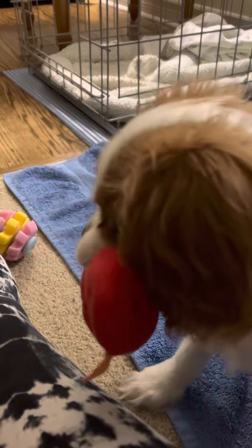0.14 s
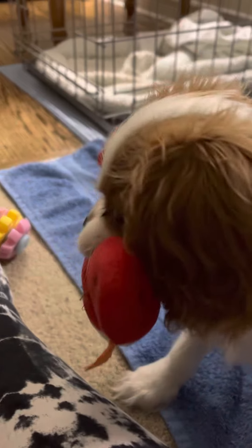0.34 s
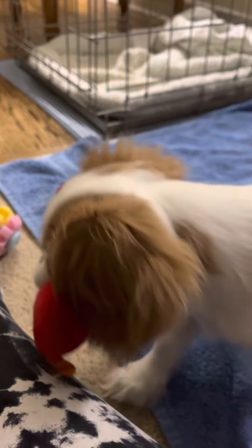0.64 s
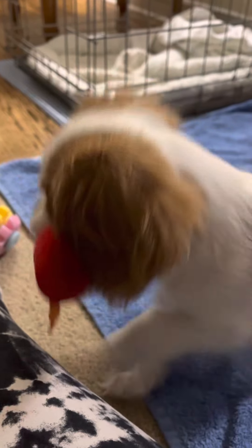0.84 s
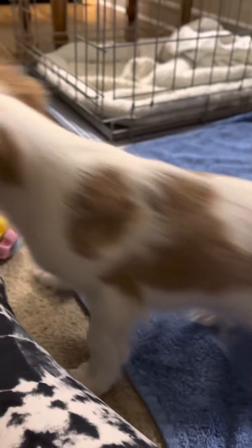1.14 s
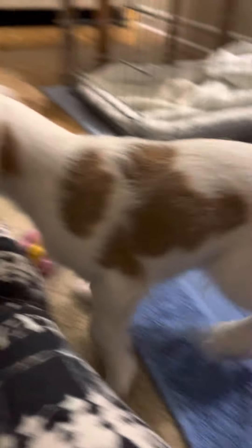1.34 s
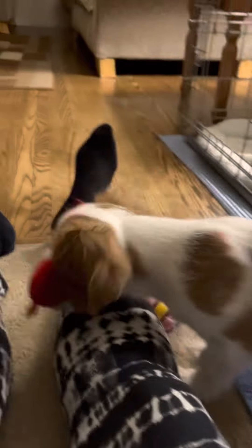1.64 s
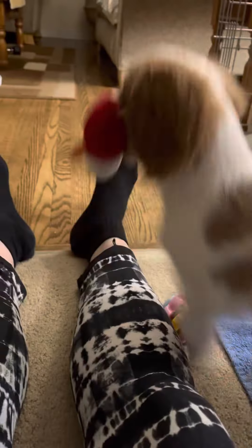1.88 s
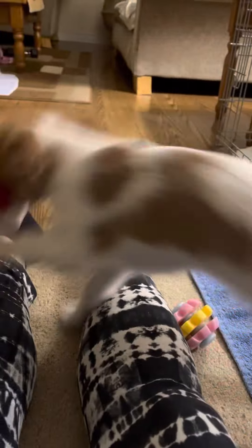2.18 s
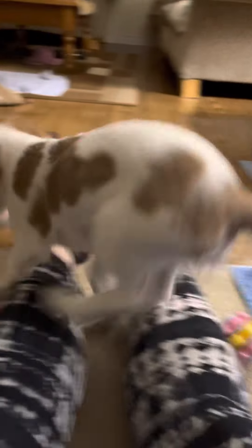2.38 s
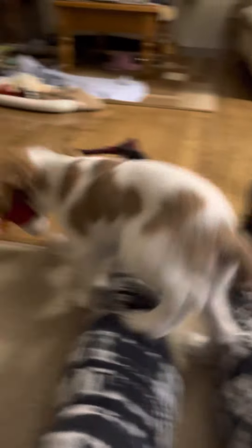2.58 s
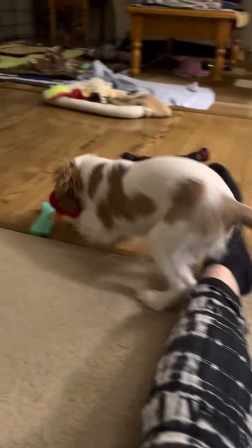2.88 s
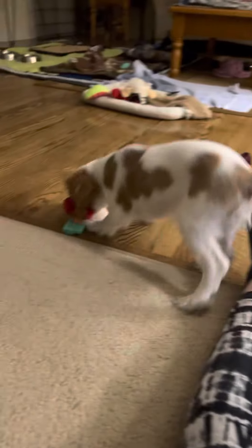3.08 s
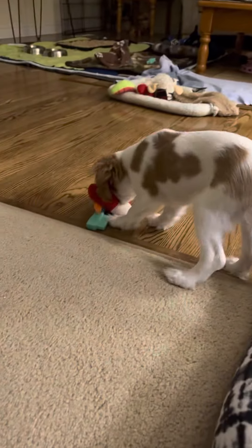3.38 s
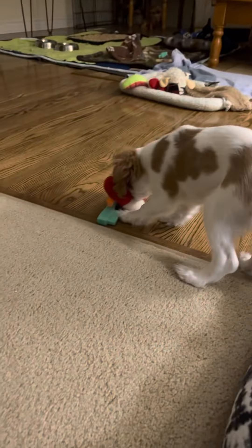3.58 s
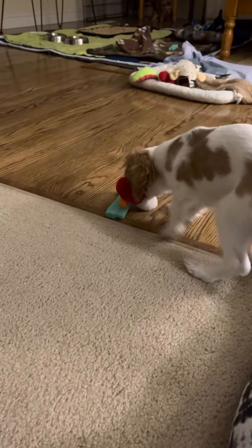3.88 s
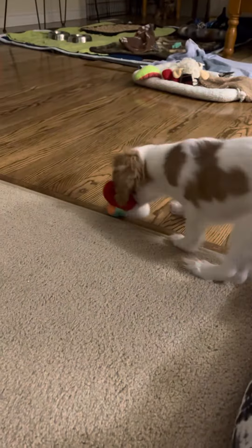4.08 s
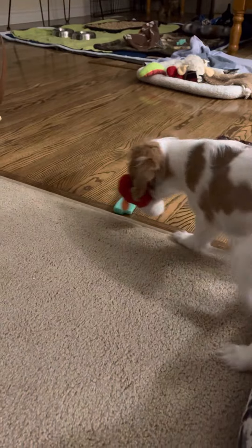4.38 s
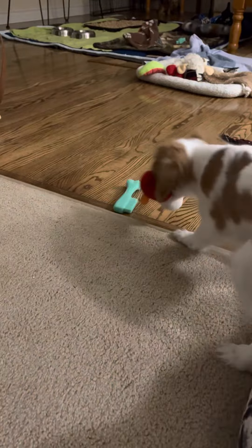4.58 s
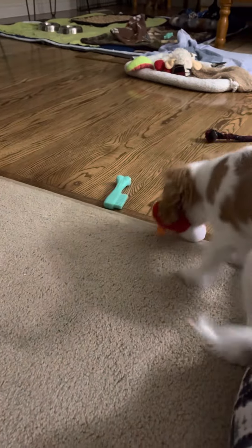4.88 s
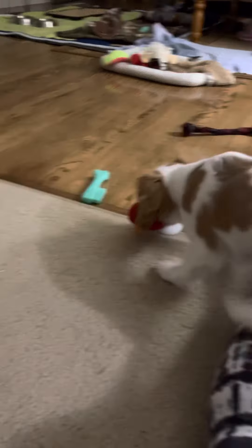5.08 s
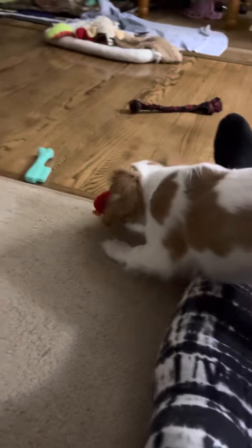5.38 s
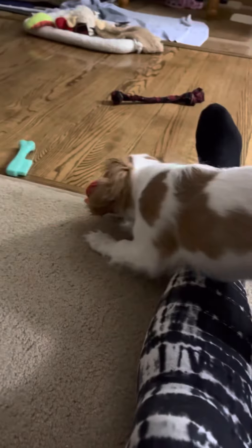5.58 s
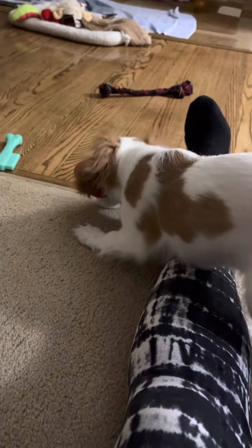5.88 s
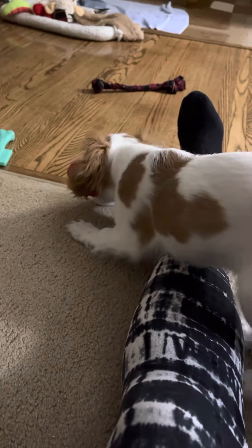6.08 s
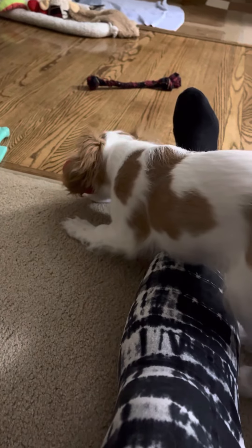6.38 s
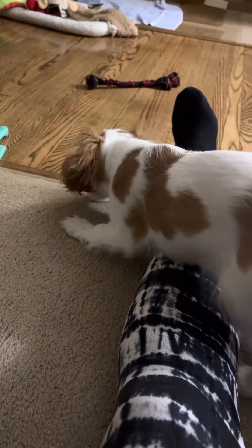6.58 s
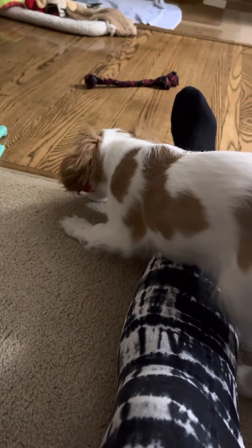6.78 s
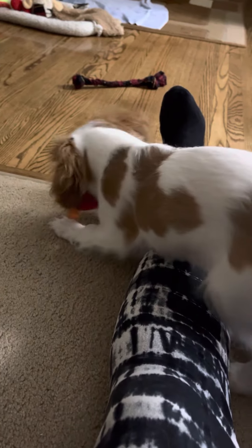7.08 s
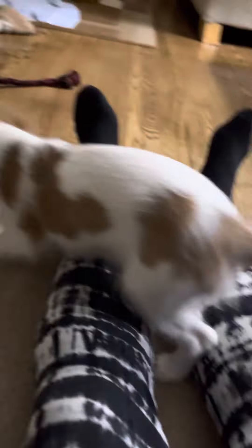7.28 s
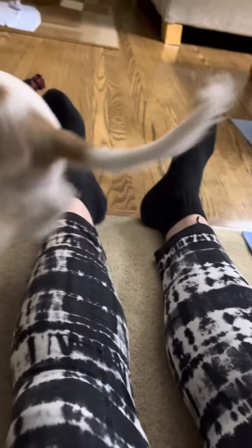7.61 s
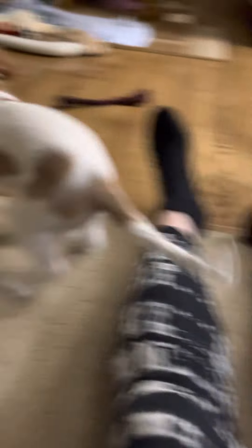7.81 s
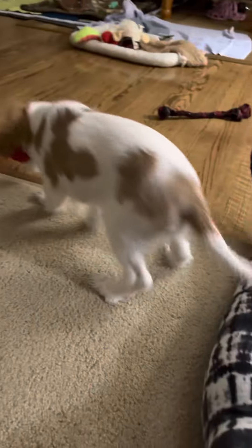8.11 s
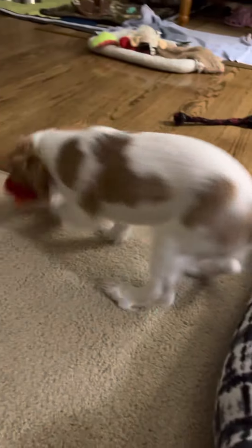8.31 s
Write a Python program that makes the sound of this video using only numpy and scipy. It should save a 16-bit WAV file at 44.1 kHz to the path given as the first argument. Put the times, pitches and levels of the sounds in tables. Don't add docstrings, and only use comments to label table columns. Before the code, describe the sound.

A squeaker toy is chewed at irregular intervals: sparse loud squeaks first, then a steadier run of two or three bites a second, a near pause, and a final flurry. Popping plastic, small clicks and brief lower release chirps accompany them. Beneath are muffled shuffling on carpet, brushing fur and a very quiet appliance hum, captured by a nearby stereo phone in a small, lightly echoing room.

```python
import sys
import numpy as np
from scipy import signal
from scipy.fft import rfft, irfft, next_fast_len
from scipy.io import wavfile
from scipy.ndimage import uniform_filter1d, map_coordinates

SR = 44100
rng = np.random.default_rng(int(sys.argv[2]) if len(sys.argv) > 2 else 0)


def gain_from_db(level_db):
    decades = np.asarray(level_db, float) / 20
    return 10 ** decades


def bounce(signal):
    frames = np.transpose(np.atleast_2d(signal))
    limited = np.clip(frames, -1, 1)
    pcm = np.round(limited * 32767).astype(np.int16)
    wavfile.write(sys.argv[1], SR, pcm)


N = 372644


def along(points, at):
    f, v = np.transpose(points)
    return np.interp(np.log(at + 1), np.log(f + 1), v)


def curves(rows):
    s, *cols = np.transpose(rows)
    return [np.interp(np.arange(N) / SR, s, c) for c in cols]


def wobble(rate, size=N):
    knots = rng.standard_normal(int(size * rate / SR) + 4)
    return map_coordinates(knots, [np.arange(size) * rate / SR])


def filtered(x, response):
    m = next_fast_len(N + 8192)
    return irfft(rfft(x, m) * response(np.fft.rfftfreq(m, 1 / SR)), m)[..., :N]


def noise(spectrum, channels=1):
    x = filtered(rng.standard_normal((channels, N)), lambda hz: gain_from_db(along(spectrum, hz)))
    return x / x.std()


def strike(t, decay, attack):
    return np.exp(-t / decay) * (1 - np.exp(-t / attack))


def add(track, s, x):
    part = track[round(s * SR):][:len(x)]
    part += x[:len(part)]


# f/Hz, likeness [0..1]
LIKENESS = [(60, .97), (300, .55), (800, .3), (2000, .6), (4500, .3), (5700, .98), (15000, .98)]


def spread(pair):
    turn = lambda hz: np.arccos(np.clip(along(LIKENESS, hz), -1, 1)) / 2
    mid, side = filtered(pair, lambda hz: np.array([np.cos(turn(hz)), np.sin(turn(hz))]))
    return np.array([mid + side, mid - side])


# f/Hz, level/dB
HUM = [(60, -66.5), (119.5, -72), (312, -81), (1001, -88)]


def appliance_hum():
    t, hum = np.arange(N) / SR, np.zeros(N)
    for hz, db in HUM:
        level = gain_from_db(db + 4.6 * wobble(9)) * np.sqrt(2)
        hum += level * np.sin(2 * np.pi * hz * t + .5 * wobble(2.6))
    return hum


# t/s, legs level/dB, fur on cloth level/dB
MOVES = [(0.0, -70, -98), (0.49, -73, -85.5), (0.8, -61.5, -78), (1.25, -68.5, -72), (1.48, -66, -61.5),
         (1.84, -84.5, -82.5), (2.45, -65.5, -72), (3.04, -62, -71), (3.34, -72.5, -67.5), (3.79, -66, -70),
         (4.47, -68.5, -76.5), (5.29, -66, -76), (6.21, -71, -78.5), (6.43, -73, -92.5), (6.99, -69, -86.5),
         (7.36, -60.5, -68), (7.53, -65.5, -82.5), (8.45, -71.5, -63)]
# f/Hz, level/dB
RUMBLE = [(15, -41.5), (25, -20.5), (49, 2), (123, 4), (195, -6), (260, -24), (340, -51), (570, -120)]
# f/Hz, level/dB
SHUFFLE = [(100, -35), (200, -2.5), (330, 1.5), (550, -14.5), (1100, -23.5), (3000, -37), (12000, -54.5),
           (16000, -66.5)]
# f/Hz, level/dB
RUSTLE = [(300, -41), (800, 6.5), (2000, 0.5), (5000, -13.5), (10000, -16), (13000, -17), (16000, -31.5)]


def carpet_and_fur():
    legs_db, fur_db = curves(MOVES)
    rumble_db = 0.9 * (legs_db + 69) - 59 + 2.2 * wobble(7)
    shuffle_db = legs_db + 5.5 + 3.5 * wobble(22)
    rustle_db = fur_db + 4.5 + 2.5 * wobble(20) + 2.5 * wobble(250)
    rumble = gain_from_db(rumble_db) * noise(RUMBLE, channels=2)
    shuffle = gain_from_db(shuffle_db) * noise(SHUFFLE, channels=2)
    rustle = gain_from_db(rustle_db) * noise(RUSTLE, channels=2)
    return spread(rumble + shuffle + rustle)


# t/s, level/dB
FAR = [
    (0, -14),
    (1.2, -14.5),
    (2, -7),
    (3.5, -5.5),
    (6, -5),
    (8.45, -2),
]
# f/Hz, t60/s
DECAY = [(300, 0.1), (1000, 0.36), (3000, 0.33), (8000, 0.34), (14000, 0.21)]
# t/s, level/dB
WALLS = [(.004, -10), (.013, -7.5), (.034, -8.5), (.041, -9)]
# f/Hz, level/dB
WALL_COLOUR = [(700, -1), (1500, -2.2), (2500, -0.5), (4500, 2.5), (7000, 2), (15000, 3.5)]


def room(x):
    step = SR // 12
    wet, fade = np.zeros((2, N + 2 * SR)), np.hanning(2 * step)
    x = x * gain_from_db(curves(FAR)[0])
    x = x * (.8 + .6 * wobble(650))
    for start in range(0, N, step):
        hz, t, z = signal.stft(rng.standard_normal((2, SR // 2)), SR, nperseg=256)
        decay = gain_from_db(-60 * t / along(DECAY, hz)[:, None])
        tail = signal.istft(z * decay, SR, nperseg=256)[1]
        tail = tail * np.clip(np.arange(tail.shape[1]) / (0.0025 * SR), 0, 1) / np.linalg.norm(tail[0])
        for s, db in WALLS:
            tail[0, round((s + .0015 * rng.random()) * SR)] += gain_from_db(db) * rng.choice([-1, 1])
        piece = np.pad(x, (step, step))[start:][:2 * step]
        echo = signal.fftconvolve((piece * fade[:len(piece)])[None], tail, axes=1)
        wet[:, start:start + echo.shape[1]] += echo
    return spread(filtered(wet[:, step:step + N], lambda hz: gain_from_db(along(WALL_COLOUR, hz))))


# t/s, peak level/dB, floor f/Hz
PAWS = [
    (2.431, -43.5, 316),
    (2.474, -37.5, 319),
    (2.862, -41, 358),
    (2.888, -38.5, 302),
    (7.839, -36, 112.9),
    (7.869, -34, 130),
    (7.945, -44, 134.8),
]


def paws():
    out, t = np.zeros(N), np.arange(SR // 30) / SR
    for s, db, hz in PAWS:
        add(out, s, gain_from_db(db + 11.5) * np.sin(2 * np.pi * hz * t) * strike(t, 1.18 / hz, 0.78 / hz))
    return out


# t/s, edge peak level/dB, knock level/dB
CRACKLE = [(0.2024, -51, -17), (0.9, -55.5, -13), (1.276, -52.5, 9), (1.2971, -49.5, -8), (1.3104, -51, 8),
           (1.3216, -50, 0.5), (1.3379, -53.5, 4.5), (1.3523, -42, 7), (1.3604, -56.5, 0),
           (1.3684, -52.5, 11), (1.3765, -50.5, -9.5), (1.3833, -52, 2), (1.3967, -48, -10.5),
           (1.4114, -50.5, -9.5), (1.4176, -43.5, -2.5), (1.4245, -57.5, 3.5), (1.4311, -39.5, 1),
           (1.4374, -38.5, -7.5), (1.4435, -50, 12.5), (1.4591, -50.5, -4.5), (1.481, -41, -2),
           (1.4933, -52.5, 4), (1.5066, -51, 5), (2.5276, -52.5, -5), (2.6304, -41.5, -22),
           (3.6454, -41, -5)]


def crackle():
    out, t = np.zeros(N), np.arange(SR // 30) / SR
    for s, db, knock_db in CRACKLE:
        edge = uniform_filter1d(rng.standard_normal(len(t)), size=5) * np.exp(-t / .0007)
        hz = 1050 * (1 + .14 * rng.standard_normal())
        knock = np.sin(2 * np.pi * hz * (t - 40 * t * t)) * strike(t, .0018, .001)
        add(out, s, gain_from_db(db + 14) * edge + gain_from_db(db + knock_db + 11.5) * knock)
    return out


# t/s, peak level/dB
TICKS = [(0.31, -44.5), (0.862, -38), (1.97, -65), (2.472, -54.5), (2.489, -53), (2.824, -43),
         (2.878, -51.5), (2.894, -35), (2.92, -49), (3.265, -29), (3.665, -33), (5.146, -28),
         (5.239, -31.5), (7.284, -40.5), (7.321, -34.5), (7.388, -30.5), (7.407, -66), (7.652, -25.5),
         (7.843, -31), (7.9, -22.5), (8.081, -31.5), (8.313, -24.5), (8.351, -62), (8.419, -49),
         (8.434, -30.5)]
# first t/s, last t/s, gap t/s, first level/dB, last level/dB
CREAKS = [
    (0.661, .812, .0304, -38, -38.5),
    (2.585, 2.622, .017, -47, -49),
    (3.033, 3.078, .0185, -58, -44),
    (3.554, 3.638, .02, -27.5, -51),
]


def ticks():
    out, t = np.zeros(N), np.arange(SR // 30) / SR
    runs = [np.linspace((first, db), (last, last_db), round((last - first) / gap) + 1)
            for first, last, gap, db, last_db in CREAKS]
    for s, db in np.vstack([TICKS, *runs]):
        stiffness = 1 + .12 * rng.standard_normal()
        cycles = stiffness * (900 * t + 2900 * .0007 * (1 - np.exp(-t / .0007)))
        shape = np.exp(-t / .002) * (.05 + (1 - np.exp(-t / .0016)) ** 2)
        add(out, s, gain_from_db(db + 6) * np.sin(2 * np.pi * cycles) * shape)
    return out


# t/s, thump peak level/dB, snap level/dB, puff level/dB
POPS = [(0.594, -24.5, 5, 4.5), (1.566, -32, 8, 14), (1.982, -41.5, 6.5, -3), (2.18, -29, 8, 5.5),
        (2.682, -26.5, 5, -3), (3.158, -30, 8, 8), (3.352, -33, -4.5, -12), (3.5, -30, 5.5, 9.5),
        (3.665, -32.5, 0, -1.5), (3.822, -28.5, 3, 6), (4.015, -28, -9, -16), (4.173, -29, 4, 8.5),
        (4.431, -32.5, -6.5, -7.5), (4.623, -29.5, 1.5, -0.5), (4.851, -28.5, -9, -13.5),
        (4.991, -26, -1.5, -1), (5.169, -26.5, -9.5, -14.5), (5.382, -28, 3, -1), (5.538, -27, -5.5, -15.5),
        (5.743, -24.5, -6, -1), (6.002, -28, -8, -16.5), (6.175, -26, -1.5, 3.5), (6.954, -29, -30, -60.5),
        (7.081, -24.5, 0, 0), (7.687, -28, -16.5, -34), (7.871, -26.5, -3, 3.5), (8.024, -31, -5, -4.5),
        (8.195, -34, 8, 5), (8.322, -34.5, -14, -3)]


def pops(jet):
    out, t, crack = np.zeros(N), np.arange(SR // 16) / SR, noise(RUSTLE)[0]
    for s, db, snap_db, puff_db in POPS:
        thump_vary, snap_vary = rng.standard_normal(2)
        here = slice(round(s * SR), round(s * SR) + len(t))
        cycles = 260 * t + 700 * 0.0025 * (1 - np.exp(-t / 0.0018))
        thump = np.sin(2 * np.pi * cycles * gain_from_db(thump_vary)) * strike(t, 0.0038, 0.0031)
        thump += 0.21 * np.sin(2 * np.pi * 150 * t) * strike(t, 0.0043, 0.0027)
        snap = np.sin(2 * np.pi * 1300 * (1 + .06 * snap_vary) * t)
        snap *= np.exp(-t / .0013) * (1 - np.exp(-t / 0.0006)) ** 2
        snap += 0.34 * crack[here] * strike(t, 0.0026, 0.00047)
        puff = jet[here] * strike(t, 0.0067, 0.00096)
        pop = gain_from_db(db + 4.5) * thump + gain_from_db(db + snap_db + 12) * snap + gain_from_db(db + puff_db - 3) * puff
        add(out, s + .002, pop)
    return out


def surge(life):
    out, t = np.zeros(N), np.arange(SR // 10) / SR
    for s, *_ in POPS:
        add(out, s - .002, np.clip(t / 0.0046, 0, 1) ** 2 * np.exp(-np.clip(t - .005, 0, 1) / life))
    return out


# f/Hz, level/dB
REED = [(1500, 0.5), (3000, -5.5), (4500, -9.5), (6000, -10), (7500, -10), (9500, -7), (11500, -10.5),
        (14500, -28)]


def reed(squeaks, jet, jump, hiss_db, sag_db):
    out, push, shake = np.zeros(N), surge(life=0.0046), surge(life=0.042)
    for rows in squeaks:
        s, *cols = np.transpose(rows)
        at = np.arange(round((s[0] - .008) * SR), round((s[-1] + 0.0045) * SR))
        size, since = len(at), at - at[0]
        hz, db, edge_db = (uniform_filter1d(np.interp(at / SR, s, c), size=200) for c in cols)
        sag = sag_db * np.linspace(0, 1, size)
        db, edge_db = db + .5 * sag, edge_db + sag + .5 * sag_db
        flutter = .004 * wobble(110, size) + (.0045 + .04 * shake[at]) * wobble(700, size)
        flat_start = .12 * np.exp(-since / (.002 * SR))
        hz = hz * (1 + jump * push[at] + flutter - flat_start)
        phase = 2 * np.pi * np.cumsum(hz) / SR
        tone = np.zeros(size)
        for k in range(1, int(16000 / hz.mean()) + 1):
            share = np.clip(np.log(k) / np.log(8000 / hz), 0, 1) ** .55
            level = db + share * (edge_db - db) + along(REED, k * hz) + 3.5 * share * wobble(130, size)
            tone += gain_from_db(level + 5.4 * push[at]) * np.sqrt(2) * np.cos(k * phase - 0.88 * k * k)
        hiss = gain_from_db(edge_db + hiss_db + 4 * shake[at]) * jet[at] * (1 + 0.23 * np.cos(phase))
        ends = np.minimum(since / .0055, (at[-1] - at) / .007) / SR
        out[at] += (tone + hiss) * np.clip(ends, 0, 1) ** 2
    return out


# t/s, length t/s, reed f/Hz, first partial level/dB, partials near 9 kHz level/dB
RELEASES = [(1.15, .031, 1001, -38.5, -38.5), (3.226, .032, 1065, -33, -39), (3.588, 0.027, 986, -41, -44),
            (3.893, 0.0308, 996.5, -38, -40), (4.241, .026, 1028, -40, -44), (4.713, 0.023, 1023, -41, -45),
            (5.059, .03, 1025, -38, -43.5), (5.45, 0.029, 1058, -32, -41), (6.253, 0.023, 993, -43, -51),
            (7.549, 0.033, 1039, -38, -47.5), (7.943, .036, 1033, -38, -45), (8.255, 0.044, 1027, -39, -44)]


def releases():
    fill, squeaks = np.linspace(0, 1, 5), []
    for s, length, hz, db, edge_db in RELEASES:
        squeaks.append(np.transpose([s + fill * length, hz * .89 ** fill,
                                     db - 7 * fill ** 3.1, edge_db - 4.5 * fill ** 2]))
    return squeaks


# t/s, reed f/Hz, first partial level/dB, partials near 9 kHz level/dB,
# fade before the buckle level/dB
BITES = [(0.543, 1459, -25, -29, -2), (1.541, 1603, -25.5, -21.5, 4), (2.148, 1505, -35, -27.5, 2),
         (2.647, 1493, -34, -35, 1.5), (3.1, 1396, -34, -35, 36.5), (3.454, 1530, -34, -33.5, 4.2),
         (3.778, 1511, -34.5, -31.5, 3.5), (4.125, 1438, -38, -35.5, 3.5), (4.574, 1494, -40, -35, -2),
         (4.945, 1480, -33.5, -37.5, 4), (5.329, 1480, -34, -39.5, 2.5), (5.707, 1532, -35, -39, -0.5),
         (6.129, 1439, -35, -39.5, 1.3), (7.042, 1457, -37.5, -45, -2.1), (7.823, 1430, -47, -40, 0.5),
         (8.133, 1442, -40, -39.5, 17.5)]
# t/s, reed f/Hz, first partial level/dB
SQUEEZE = [
    (0.969, 1195, -55),
    (0.984, 1200, -43),
    (1.003, 1379, -32),
    (1.029, 1427, -29.5),
    (1.044, 1372, -34),
    (1.066, 1389, -33),
    (1.077, 1300, -46),
]


def bites():
    squeaks = [[(s, hz, db, db + 4 + .06 * min(hz - 1400, 0)) for s, hz, db in SQUEEZE]]
    hold, lowest = .3, .65
    rush_s, dying_s = .012, .0095
    for s, hz, db, edge_db, fade_db in BITES:
        pop = min(p for p, *_ in POPS if p > s + .015)
        wait = pop - s
        spent_db = fade_db if fade_db < 12 else 0
        tense = (hz + 1395) / 2
        low_fade = lowest * fade_db
        squeaks.append([
            (s, hz, db, edge_db),
            (s + hold * wait, .99 * hz, db - hold * fade_db, edge_db - hold * fade_db),
            (s + lowest * wait, .92 * hz, db - low_fade - 1.5, edge_db - low_fade - 2),
            (pop - .004, tense, db - fade_db, edge_db - fade_db),
            (pop + rush_s, tense, db - .7 - spent_db, edge_db - 3.5 - spent_db),
            (pop + rush_s + dying_s, .93 * tense, db - 9 - spent_db, edge_db - 3.5 - spent_db)])
    return squeaks


# f/Hz, level/dB
AIR = [(600, -41.5), (1500, -12), (4000, -2.5), (7500, -31.5), (10000, 11), (12000, -12), (15500, -28.5),
       (17000, -82.5)]


def chewed_toy():
    jet = noise(AIR)[0]
    indrawn = reed(releases(), jet, jump=.05, hiss_db=-5, sag_db=-6)
    pressed = reed(bites(), jet, jump=.12, hiss_db=-15, sag_db=.5)
    return paws() + crackle() + ticks() + pops(jet) + indrawn + pressed


def scene():
    toy = chewed_toy()
    return appliance_hum() + carpet_and_fur() + room(toy) + toy


# f/Hz, phase [rad]
LEAD = [(0, 0), (1000, -.9), (2700, 2), (4700, 1.25), (5900, 3), (6600, 3.35), (12000, 9.3), (13400, 9.55)]
# f/Hz, level/dB
TILT = [(300, .5), (1200, 0), (2800, -4.5), (4500, -2.5), (6000, 0)]


def stereo_shift(dry):
    half = np.array([[.5], [-.5]])
    lead = lambda hz: np.interp(hz, *np.transpose(LEAD)) + .002 * np.clip(hz - 13400, 0, None)
    level = lambda hz: (hz < 16000) * gain_from_db(half * along(TILT, hz))
    return filtered(dry, lambda hz: level(hz) * np.exp(1j * half * lead(hz)))


def low_pass(x):
    return signal.sosfilt(signal.butter(12, 16660, fs=SR, output="sos"), x)


def record(dry):
    mix = stereo_shift(dry)
    return low_pass(mix)


dry = scene()
out = record(dry)
bounce(out)
```